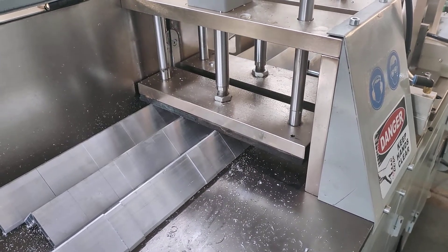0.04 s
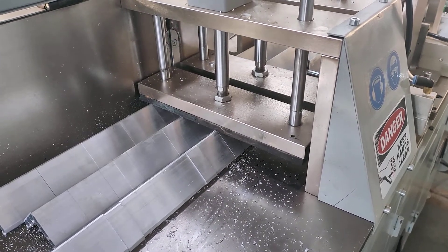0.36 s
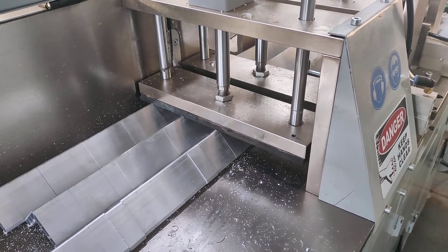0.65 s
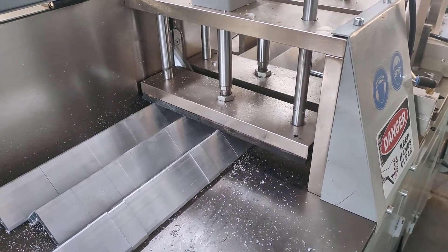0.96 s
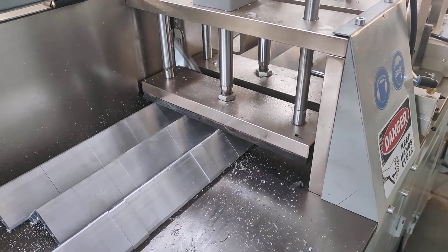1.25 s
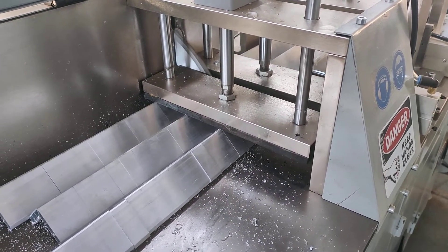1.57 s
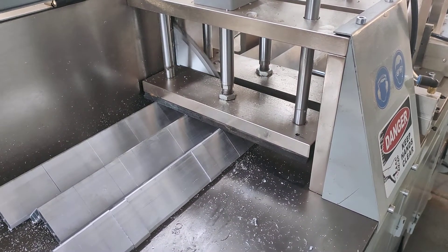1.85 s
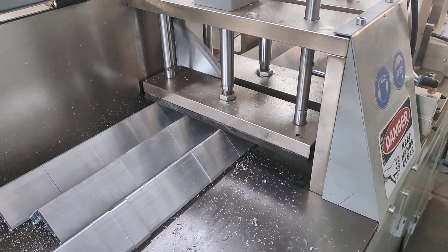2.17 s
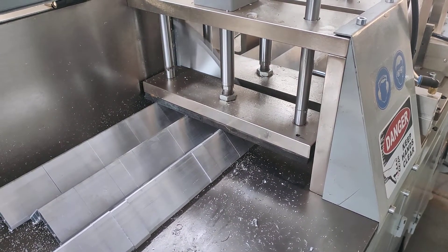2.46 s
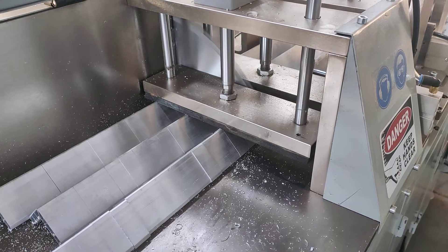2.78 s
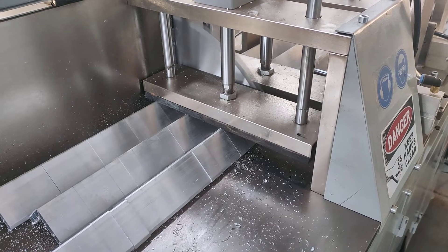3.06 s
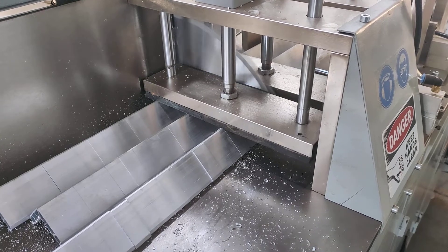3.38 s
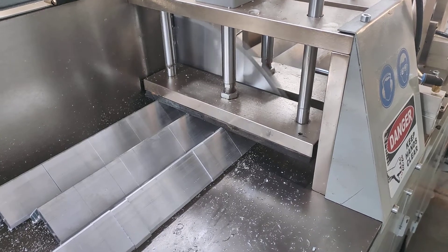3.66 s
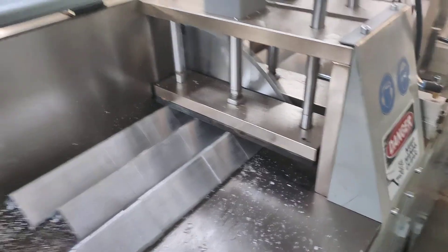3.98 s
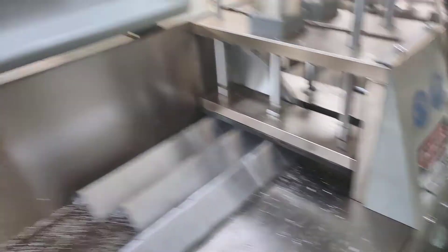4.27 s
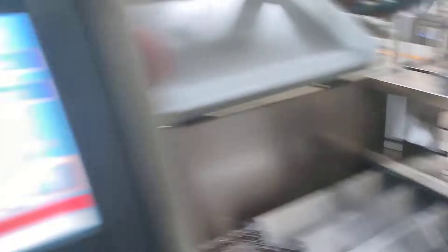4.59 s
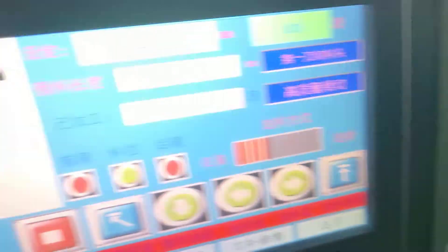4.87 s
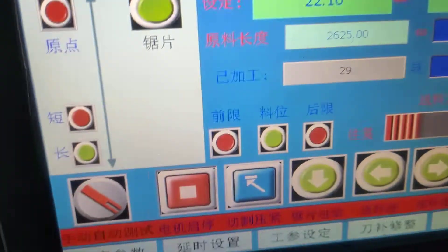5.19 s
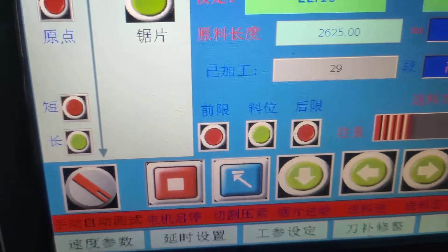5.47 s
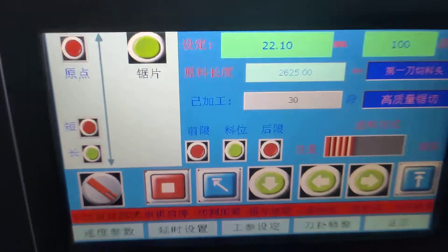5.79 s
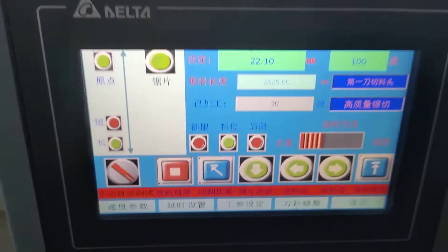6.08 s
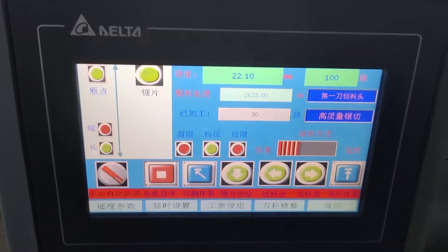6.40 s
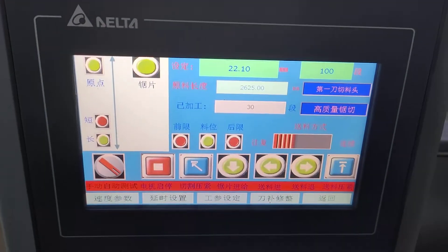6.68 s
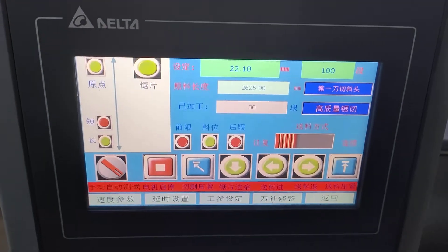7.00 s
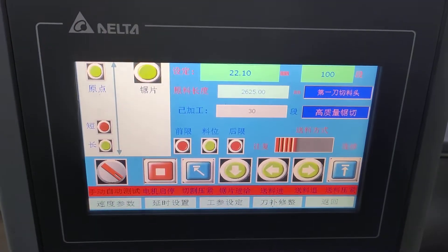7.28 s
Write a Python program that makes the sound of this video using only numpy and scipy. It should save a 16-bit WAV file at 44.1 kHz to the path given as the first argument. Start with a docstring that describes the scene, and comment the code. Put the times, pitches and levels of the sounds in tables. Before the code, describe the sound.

High, piercing saw squeals over grinding as aluminum is cut, followed by rushing air, a brief servo hum and two thumping air releases.

```python
"""Inside a steel enclosure, an automatic saw cuts three clamped aluminium profiles, heard from a phone.
The teeth whine, snap into squeals and sag in pitch at each profile, over grinding and a motor drone.
Air thrown by the blade buffets the microphone; the blade comes clear with a rush of air and chips,
then withdraws. Compressed air hisses, a feed servo hums, and two pneumatic strokes thump and vent."""
import sys
import numpy as np
from scipy import signal
from scipy.fft import rfft, irfft
from scipy.io import wavfile
from scipy.ndimage import uniform_filter1d, minimum_filter1d

SR = 44100
rng = np.random.default_rng(int(sys.argv[2]) if len(sys.argv) > 2 else 0)


def materialize(psi):
    """Save the field psi as 16-bit PCM at rate SR to the path in sys.argv[1].

    A 1-D psi becomes a single channel; in a 2-D psi each row is a channel.
    """
    bounded = np.clip(np.atleast_2d(psi).T, -1, 1)
    quanta = np.round(bounded * 32767).astype(np.int16)
    wavfile.write(sys.argv[1], SR, quanta)


N = 328545
T = np.arange(N) / SR
FREQS = np.fft.rfftfreq(N, 1 / SR) + 1e-3


def undb(db):
    """Decibels to gain."""
    return 10 ** (np.asarray(db) / 20)


def unit(x):
    """Scale to rms 1."""
    return x / np.sqrt(np.mean(np.abs(x) ** 2))


def curves(table):
    """Automation lanes: each column after the first, joined by straight lines in time."""
    times, *columns = np.transpose(table)
    return [np.interp(T, times, column) for column in columns]


def fade(start, end):
    """Ramp from 0 at start to 1 at end, in seconds; a fade-out when end comes first."""
    return np.clip((T - start) / (end - start), 0, 1)


def swells(table, rest_db):
    """Bell-shaped swells that rise out of a steady level."""
    bells = (undb(db) * np.exp(-((T - middle) / half) ** 2) for middle, half, db in table)
    return np.sqrt(undb(rest_db) ** 2 + sum(bell ** 2 for bell in bells))


def over_hz(points):
    """Join (Hz, value) points on a log-frequency axis."""
    hz, value = np.transpose(points)
    return np.interp(np.log(FREQS), np.log(hz), value)


def pan(db):
    """Constant-power gains for a level difference, left minus right."""
    return np.sqrt(2 / (1 + undb(np.array([-db, db])) ** 2)).reshape(2, -1)


def walk(rate, size=2 ** 15):
    """Smooth random modulation of rms 1; a higher rate moves faster."""
    lowpass = np.exp(-(FREQS[:size // 2 + 1] / rate) ** 2)
    slow = irfft(rfft(rng.standard_normal(size)) * lowpass)
    return unit(np.interp(np.arange(N) * size / N, np.arange(size), slow))


def scatter(rate):
    """Wandering strength and phase of a tone after many reflections, different at each microphone."""
    return unit(np.array([walk(rate) + 1j * walk(rate) for _ in range(2)]))


def tone(phase, diffuse, rate):
    """A partial that arrives partly direct, later on the right, and partly scattered."""
    direct = np.sqrt(1 - diffuse) * np.exp(-1j * np.array([[0], [1.5]]))
    reflected = np.sqrt(diffuse) * scatter(rate)
    return np.sqrt(2) * np.real(np.exp(1j * phase) * (direct + reflected))


def noise(colour, band):
    """Coloured noise, narrow in the bass and wide on top; its mono mix has rms 1 in the band (Hz)."""
    # Stereo width. Each row: frequency in Hz, likeness of left and right (1 or more is alike).
    likeness = [(60, 1.4), (250, 0.76), (650, 0.78), (1300, -0.09), (2400, 0.15), (5000, 0), (15000, 0)]
    # Stereo lean. Each row: frequency in Hz, left minus right in dB.
    balance = [(100, -3), (600, 0.5), (1300, -1.5), (4400, -2.5), (8000, -0.5), (15000, 3.5)]
    alike = np.clip(over_hz(likeness), -1, 1)
    mid, side = rfft(rng.standard_normal((2, N)))
    side = side * np.sqrt(1 - alike) * np.array([[1], [-1]])
    spectrum = (mid * np.sqrt(1 + alike) + side) * undb(over_hz(colour)) * pan(over_hz(balance))
    inside = (FREQS > band[0]) & (FREQS < band[1])
    return irfft(spectrum, N) / np.std(irfft(spectrum.mean(axis=0) * inside, N))


def shelf(x, corner_hz, db):
    """High shelf whose gain may move."""
    treble = irfft(rfft(x) / (1 + (corner_hz / FREQS) ** 6), N)
    return x + (undb(db) - 1) * treble


def tooth_rate():
    """The blade slows under the cut, sags at each profile and runs up again once it is through."""
    # The blade meets each profile's ridge. Each row: start in seconds, drop in tooth rate in Hz.
    profiles = [(.6, 85), (1.631, 86), (2.65, 88)]
    free_hz, drag_hz = 4954, 89.65
    cut_start_s, cut_end_s, inertia_s, deepest_sag_s = -.07, 3.5, .42, .255
    slowing = 1 - np.exp(-np.maximum(T - cut_start_s, 0) / inertia_s)
    recovery = 1 - np.exp(-np.maximum(T - cut_end_s, 0) / inertia_s)
    hz = free_hz - drag_hz * (slowing - recovery)
    for start, drop_hz in profiles:
        age = np.maximum(T - start, 0) / deepest_sag_s
        hz = hz - drop_hz * (age * np.exp(1 - age)) ** 2
    return hz


def squeal(phase):
    """The tooth tone snaps into arched bursts; standing waves give each its own stereo position."""
    # Squeals. Each row: start and end in seconds, level in dB, left minus right in dB,
    # phase lag between the sides in radians.
    squeals = [(-.02, .135, -9, -8, 1.4), (.15, .28, -19, 0, .9), (.375, .435, -9.5, -16, 2.6),
               (.585, .613, -12.5, -12, -1.6), (.626, .685, -7, -9, .3), (.703, .905, -8, -10, 1.3),
               (.93, .988, -8.5, -5, 2.6), (1.005, 1.255, -10, -9, -1.8), (1.41, 1.755, -8, -10, 1.7),
               (1.778, 1.9, -10, -9, 2.4), (1.925, 1.985, -11, -7, 2.8), (2.003, 2.068, -9.5, -3, 2.1),
               (2.21, 2.28, -10, -7, 1.8), (2.3, 2.465, -14.3, -4, 2.1), (2.485, 2.66, -13.3, -6, 1.7),
               (2.688, 2.805, -8.5, -7, 1.4), (2.848, 2.9, -10, -11, -2.3), (2.922, 3.022, -9.5, -5, 2.5),
               (3.53, 3.66, -19, -2, -.4), (3.84, 4.235, -16.3, -13, .7), (4.43, 4.6, -12.5, -5, 1.1),
               (4.64, 4.77, -10, -3, 2.7), (4.835, 4.888, -12, -15, 1.5), (4.907, 4.963, -13, -7, -.6),
               (5.022, 5.072, -9.5, -11, 3), (5.092, 5.118, -16, -8, -1.5), (5.14, 5.172, -15, -9, 1.2),
               (5.193, 5.385, -12, -11, -.3)]
    # The quieter whine between squeals. Each row: time in seconds, level in dB.
    whine_levels = [(0, -20.5), (1.33, -21), (2.1, -17.5), (2.7, -15), (3.05, -26), (3.2, -25.5),
                    (3.55, -17), (3.72, -24), (5.4, -15)]
    rise_s, fall_s, arch_db = .012, .02, 1.5
    bursts, squealing = np.zeros((2, N), complex), np.zeros(N)
    for start, end, db, pan_db, lag in squeals:
        near = slice(*np.searchsorted(T, [start - rise_s, end + fall_s]))
        t = T[near]
        gate = np.clip((t - start) / rise_s + .5, 0, 1) * np.clip((end - t) / fall_s + .5, 0, 1)
        along = np.clip(2 * (t - start) / (end - start) - 1, -1, 1)
        arch = undb(arch_db * (1 / 3 - along ** 2))
        position = pan(pan_db) * np.exp(1j * lag * np.array([[1], [0]]))
        bursts[:, near] += gate * arch * undb(db) * position
        squealing[near] += gate
    # the strength wavers as the standing waves shift
    waver = undb(1.3 * walk(17)) * (1 + .13 * scatter(54) + .23 * scatter(12))
    loud = np.sqrt(2) * np.real(bursts * waver * np.exp(1j * phase))
    whine_db, = curves(whine_levels)
    whine = tone(phase, diffuse=.3, rate=28) * undb(whine_db) * pan(-3.5)
    return loud + whine * np.maximum(1 - squealing, 0)


def blade():
    """Teeth pass at nearly 5 kHz; alternate high and low teeth add half orders."""
    # The whine's edge. Each row: time in seconds, second and third harmonic levels in dB.
    edge = [(0, -38, -32), (.15, -29.5, -17), (.28, -31, -29), (.43, -15, -20), (.6, -31.5, -27),
            (.85, -24.5, -29), (1.3, -33, -19), (1.55, -20, -20), (1.8, -24, -28), (1.95, -29, -33),
            (2.25, -28.5, -22), (2.5, -28, -27), (3.1, -28.5, -30), (3.35, -32, -23), (3.95, -38, -27),
            (4.38, -23, -27), (4.75, -29.5, -30), (5.28, -21, -30)]
    # Ring of the upper half orders. Each row: time in seconds, level in dB.
    chatter = [(0, -29), (.55, -24), (.8, -31.5), (2.6, -33.5), (3.1, -35), (4.3, -35), (4.55, -21.5),
               (4.75, -40), (5.4, -28)]
    # Flares as alternate teeth bite. Each row: middle and half length in seconds, level in dB.
    bites = [(.17, 0.037, -25), (1.06, .06, -29), (1.59, 0.11, -20.5), (2.12, 0.018, -21),
             (2.4, 0.066, -27.5)]
    second_db, third_db = curves(edge)
    chatter_db, = curves(chatter)
    tooth_hz = tooth_rate() * (1 + .0004 * walk(40) + .0007 * walk(7))
    phase = 2 * np.pi * np.cumsum(tooth_hz) / SR
    second = tone(2 * phase, diffuse=.3, rate=26) * undb(second_db) * pan(2.2)
    third = tone(3 * phase, diffuse=.4, rate=36) * undb(third_db) * pan(3.2)
    half = tone(phase / 2, diffuse=.25, rate=50) * swells(bites, rest_db=-32.5) * fade(3.13, 2.86)
    three_halves = tone(1.5 * phase, diffuse=.47, rate=30) * undb(chatter_db)
    five_halves = tone(2.5 * phase, diffuse=.8, rate=45) * undb(chatter_db - 4.5)
    overtones = second + third + half + three_halves + five_halves
    return squeal(phase) * fade(5.47, 5.38) + overtones * fade(5.41, 5.3)


def grinding():
    """Broad noise of the cut and the shop, flickering as chips break away."""
    # The grind's EQ. Each row: frequency in Hz, relative level in dB.
    colour = [(40, -81), (100, -70), (250, -61.5), (900, -62), (1150, -59), (1650, -62), (2300, -55.5),
              (3300, -63), (5200, -55), (6200, -62.5), (7300, -61.5), (8900, -68.5), (12500, -66),
              (15300, -71)]
    # Its automation. Each row: time in seconds, level in dB, treble shelf in dB.
    moves = [(0, -35, -1.5), (.58, -30.5, -3), (.8, -34, 1), (1.45, -33, -1.5), (1.6, -29.5, -1.5),
             (2.2, -34, 1.5), (2.4, -32, -3), (3, -31, 1.5)]
    grind_db, treble_db = curves(moves)
    grind = shelf(noise(colour, band=(300, 1900)), 5000, treble_db + walk(24))
    return grind * undb(grind_db + .49 * walk(42)) * fade(3.33, 2.94)


def motor():
    """The drive motor pulses twice a turn, an uneven drone under everything."""
    # The drone's fader. Each row: time in seconds, level in dB.
    levels = [(0, -42.5), (.45, -44), (.7, -55.5), (3.0, -61), (3.4, -46), (4.8, -54.5), (5.6, -48.5),
              (6.2, -46), (6.85, -40), (7.45, -65)]
    drone_hz = 100.2
    drone_db, = curves(levels)
    drone = np.real(np.exp(2j * np.pi * drone_hz * T) * (1 + 1.2 * scatter(9.3)[0]))
    return unit(drone) * undb(drone_db)


def draught():
    """Air thrown by the blade buffets the microphones, the left one most."""
    # Gusts. Each row: middle and half length in seconds, level in dB.
    gusts = [(.22, 0.058, -28), (1.09, .04, -32), (1.33, 0.1, -30), (1.59, 0.065, -21.5), (2.14, .03, -36),
             (2.38, 0.081, -27), (2.6, 0.065, -26.5), (2.92, 0.052, -34)]
    # The rumble's EQ. Each row: frequency in Hz, relative level in dB.
    colour = [(15, -18), (35, -2), (60, 2.5), (120, -6), (300, -11.5), (1000, -14.5), (4000, -64)]
    buffet = unit(irfft(rfft(rng.standard_normal((2, N))) * undb(over_hz(colour)), N))
    return buffet * swells(gusts, rest_db=-41.5) * pan(11.5) * fade(3.15, 2.97)


def free_blade():
    """Coming clear, the open blade fans air and chips through the enclosure."""
    # The rush's EQ. Each row: frequency in Hz, relative level in dB.
    colour = [(30, -68), (70, -63), (140, -58), (210, -54), (450, -58), (750, -53), (1300, -56),
              (2000, -52), (2800, -50), (3300, -52.5), (4400, -49), (6000, -54.5), (7400, -54),
              (8900, -61.5), (12000, -59), (15300, -63.5)]
    # Its automation. Each row: time in seconds, level in dB, treble and body in dB before their lifts.
    moves = [(3.05, -29.5, -4, -2), (3.32, -24.5, -3.5, -6.5), (3.5, -22.5, -5.5, -5.5),
             (4.05, -23, -6.5, -6.5), (4.35, -21, -7, -7), (4.65, -30, -1, 1), (4.74, -33, -4.5, 0),
             (4.85, -32, 2, 1.5), (5.31, -28, -3, 0.5), (5.5, -37.5, -13, 7.5)]
    treble_lift_db, body_lift_db = 5.5, 5
    rush_db, treble_db, body_db = curves(moves)
    rush = noise(colour, band=(3200, 4500))
    rush = shelf(rush, 4600, treble_db + treble_lift_db + .71 * walk(35))
    body_db = body_db + body_lift_db
    rush = shelf(rush, 1520, -body_db) * undb(body_db)  # acts as a low shelf
    return past_guard(rush) * undb(rush_db + .87 * walk(21)) * fade(2.994, 3.225) * fade(5.54, 5.44)


def compressed_air():
    """Air escapes through a port that rings near 2.3 kHz; the flow builds in stages and flutters."""
    # The hiss's EQ. Each row: frequency in Hz, relative level in dB.
    colour = [(30, -75), (50, -64), (85, -60.5), (260, -59), (600, -63.5), (1100, -63.5), (1750, -60),
              (2100, -49), (2400, -47), (2900, -52), (3300, -57), (5000, -53.5), (7400, -55), (8700, -64.5),
              (12500, -62.5), (15300, -65)]
    hiss = shelf(noise(colour, band=(1900, 2900)), corner_hz=4640, db=-4)
    opening = .26 * fade(3.6, 5.9) + .39 * fade(5.33, 5.48) + .32 * fade(5.28, 6.1)
    return hiss * undb(-21 + .76 * walk(60)) * opening


def past_guard(x):
    """As the phone swings behind the steel guard, the guard's reflections make the sound hollow."""
    # The hollow EQ. Each row: frequency in Hz, gain in dB.
    colour = [(140, -7), (260, -1), (450, -3.5), (780, -2.5), (1020, -6.5), (1400, 2), (1700, -2),
              (2300, 3.5), (3300, -0.5), (4400, -1), (5500, 3), (9000, -2)]
    hollow = irfft(rfft(x) * undb(over_hz(colour)), N)
    behind = fade(3.94, 4.5)
    return (1 - behind) * x + behind * hollow


def servo():
    """The feed runs at near-constant speed and hums through the frame, swelling in before it stops."""
    # The hum. Each row: harmonic number, relative level in dB, fade exponent (larger arrives later).
    harmonics = [(1, 2.5, 0.75), (2, -5.5, 1.9), (3, -11.5, 1.7), (4, -17, 1.8)]
    hum_hz, start_s, full_s, stop_s, release_s = 247.8, 5.09, 6.23, 6.58, .19
    running = fade(start_s, full_s) * fade(stop_s + release_s, stop_s)
    phase = 2 * np.pi * np.cumsum(hum_hz * (1 + .00162 * walk(6.7))) / SR
    hum = sum(np.sin(order * phase) * undb(db + .5 * walk(21)) * running ** exponent
              for order, db, exponent in harmonics)
    return np.sqrt(2) * hum * undb(-33.5) * pan(-2.9)


def pneumatics():
    """Each stroke thumps the frame and vents; the exhaust whistle falls as the pressure drops."""
    # Strokes. Each row: start in seconds, thump in dB, vent in dB, vent decay in seconds, whistle in
    # dB, whistle decay in seconds, its starting pitch in Hz, its fall in octaves per second.
    strokes = [(5.885, -28, -24, .06, -17, .019, 6160, .3), (7.092, -31, -29, .4, -19, .36, 6390, 2)]
    # EQs of the thump and the vented air. Each row: frequency in Hz, relative level in dB.
    thump_colour = [(25, -18), (50, -3), (85, 4), (150, -14), (500, -17), (2000, -60)]
    vent_colour = [(1500, -30), (4500, -1), (6500, -3), (9000, 2), (12500, 5), (15500, -14)]
    attack_s, thump_s = .0022, .05
    out = 0
    for start, thump_db, vent_db, vent_s, whistle_db, whistle_s, hz, fall in strokes:
        age = np.maximum(T - start, 0)
        attack = 1 - np.exp(-age / attack_s)
        thump = unit(noise(thump_colour, band=(30, 200))) * undb(thump_db) * np.exp(-age / thump_s)
        vent = unit(noise(vent_colour, band=(3000, 15000))) * undb(vent_db) * np.exp(-age / vent_s)
        # the pitch levels off once the cylinder is nearly empty
        whistle_hz = np.maximum(hz * 2 ** (-fall * age), 4200)
        phase = 2 * np.pi * np.cumsum(whistle_hz) / SR
        # a narrow core inside a broad, turbulent skirt
        core = .55 * tone(phase, diffuse=1, rate=170)
        skirt = .85 * tone(phase, diffuse=1, rate=520)
        whistle = (core + skirt) * undb(whistle_db) / (1 + (age / whistle_s) ** 3)
        out = out + attack * (thump + vent + whistle)
    return out


def scene():
    """The cut, the blade coming clear, then the air and the feed, mixed in stereo."""
    cut = blade() + grinding() + motor() + draught()
    return cut + free_blade() + compressed_air() + servo() + pneumatics()


def record(dry):
    """The phone's gain control ducks the mix on loud squeals; a limiter holds peaks; the top is cut."""
    threshold_db, ratio, response_s, top_hz = -8.5, 1.6, .012, 15600
    window = int(response_s * SR)
    louder_side = uniform_filter1d(dry ** 2, window).max(axis=0)
    power = uniform_filter1d(louder_side, window)
    overshoot = np.sqrt(np.maximum(power / undb(threshold_db) ** 2, 1))
    compressed = dry * overshoot ** (1 / ratio - 1)
    safe_gain = 1 / np.maximum(np.abs(compressed).max(axis=0), 1)
    limiter_gain = uniform_filter1d(minimum_filter1d(safe_gain, window), window)
    lowpass = signal.ellip(10, .2, 80, top_hz, fs=SR, output="sos")
    return signal.sosfilt(lowpass, compressed * limiter_gain)


dry = scene()
out = record(dry)
materialize(out)
```